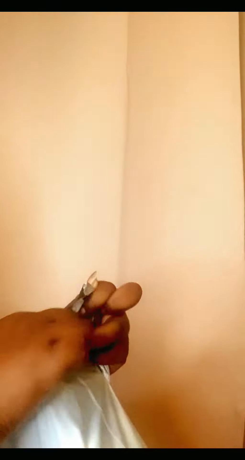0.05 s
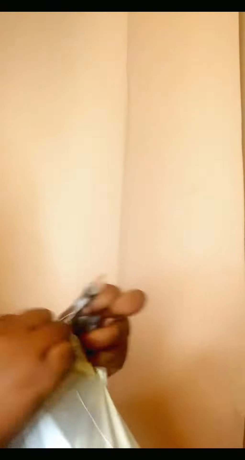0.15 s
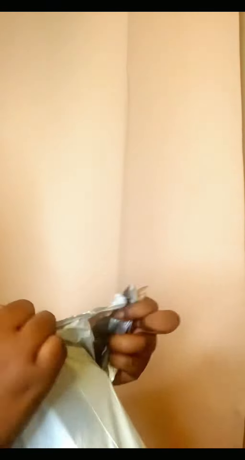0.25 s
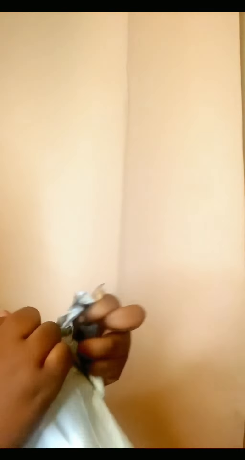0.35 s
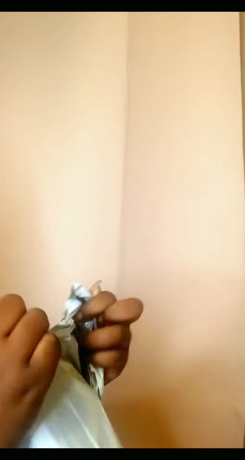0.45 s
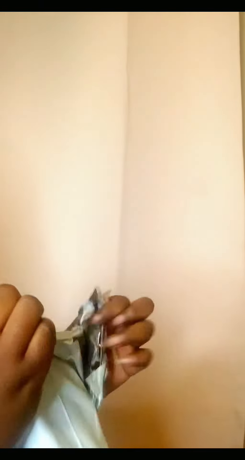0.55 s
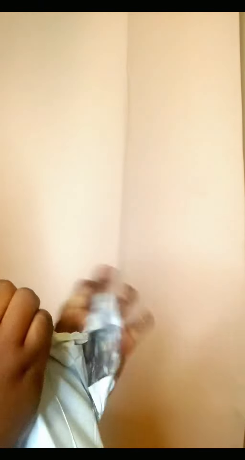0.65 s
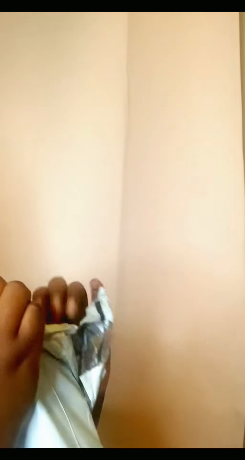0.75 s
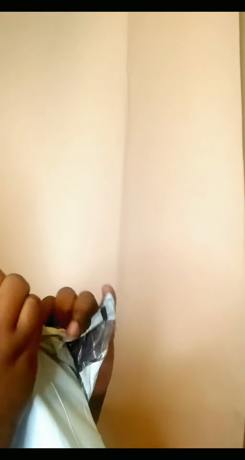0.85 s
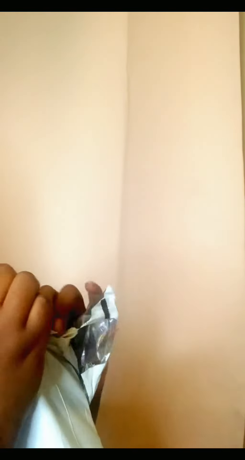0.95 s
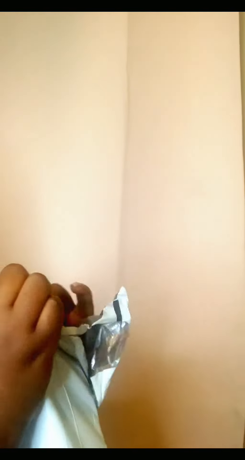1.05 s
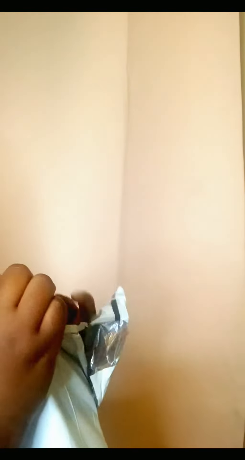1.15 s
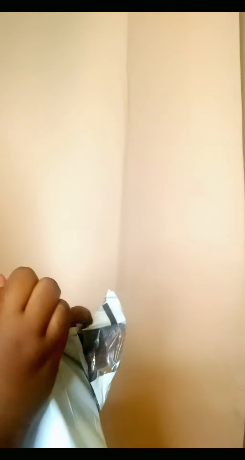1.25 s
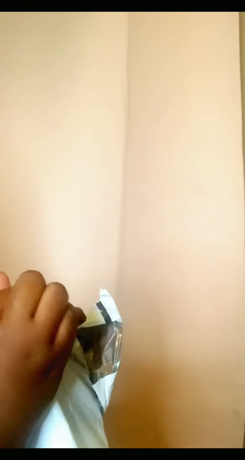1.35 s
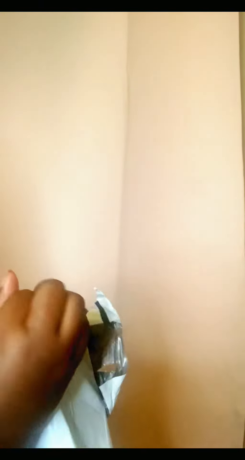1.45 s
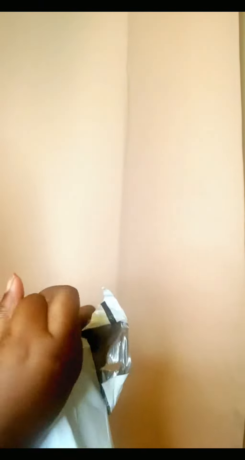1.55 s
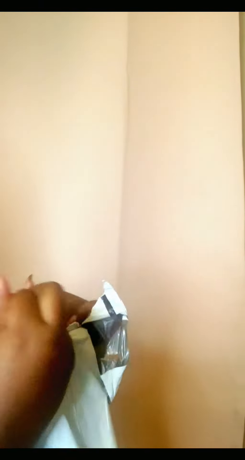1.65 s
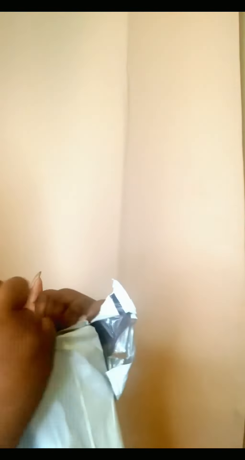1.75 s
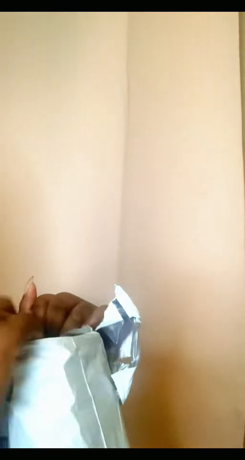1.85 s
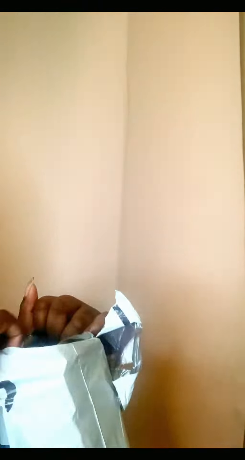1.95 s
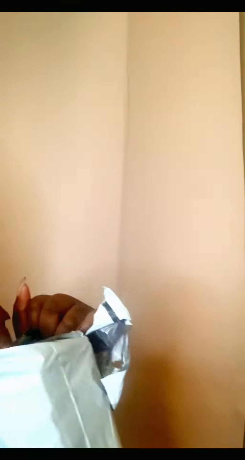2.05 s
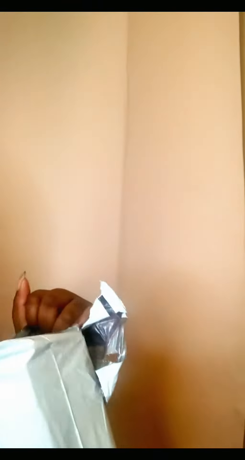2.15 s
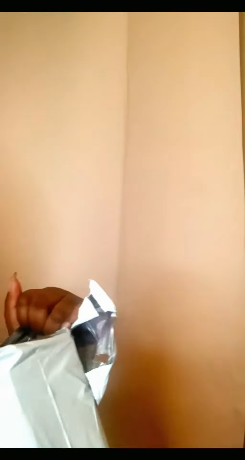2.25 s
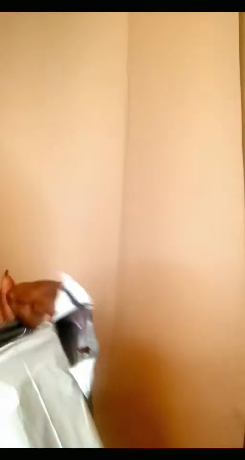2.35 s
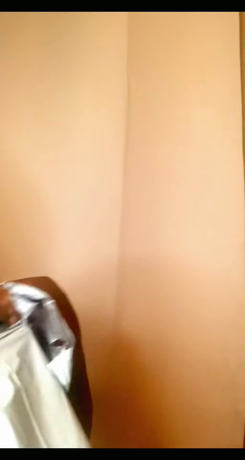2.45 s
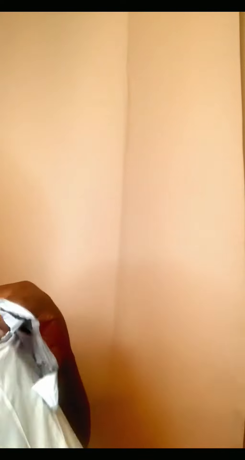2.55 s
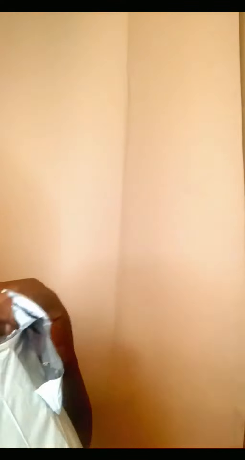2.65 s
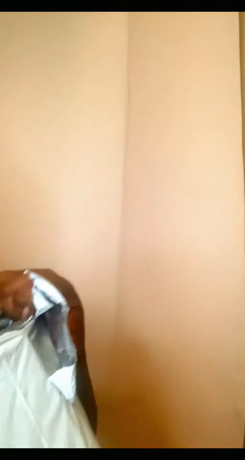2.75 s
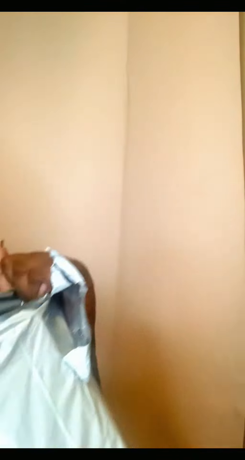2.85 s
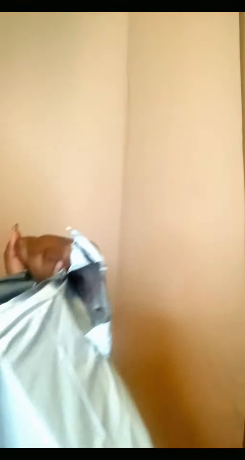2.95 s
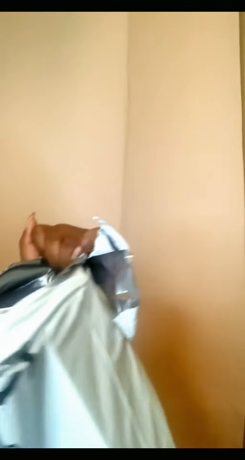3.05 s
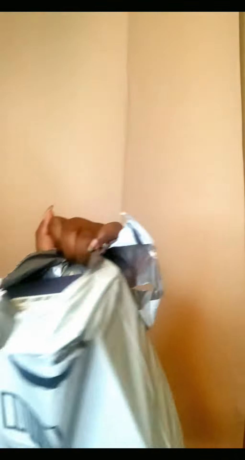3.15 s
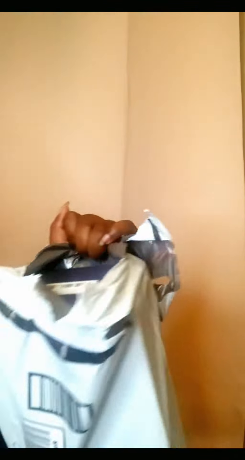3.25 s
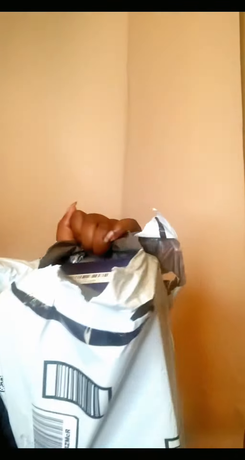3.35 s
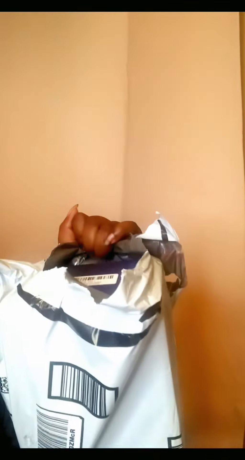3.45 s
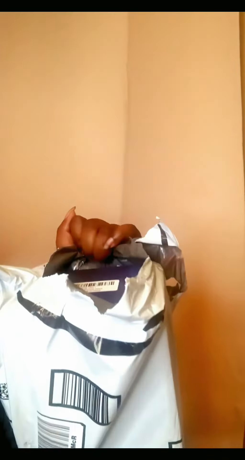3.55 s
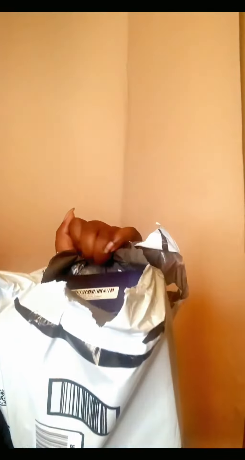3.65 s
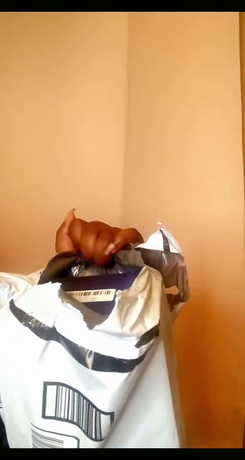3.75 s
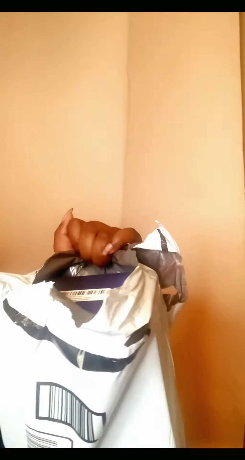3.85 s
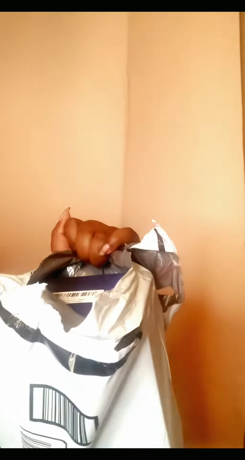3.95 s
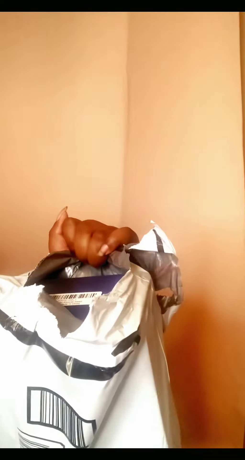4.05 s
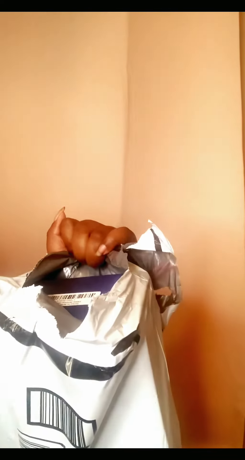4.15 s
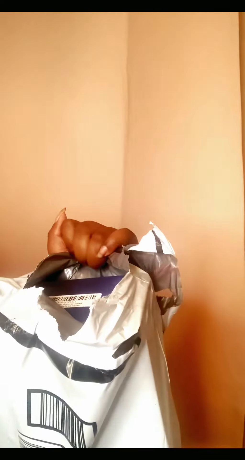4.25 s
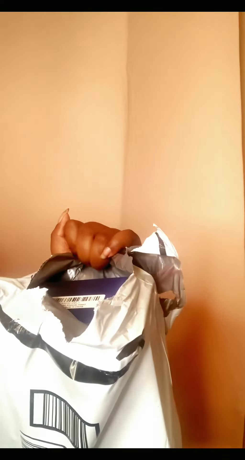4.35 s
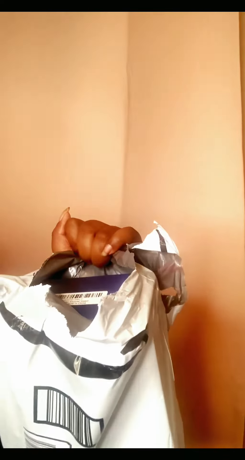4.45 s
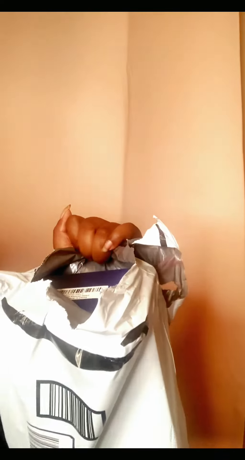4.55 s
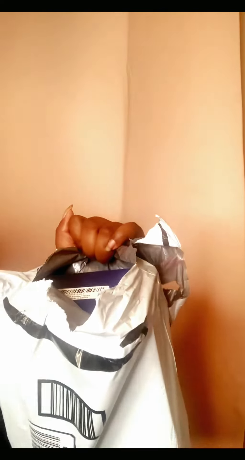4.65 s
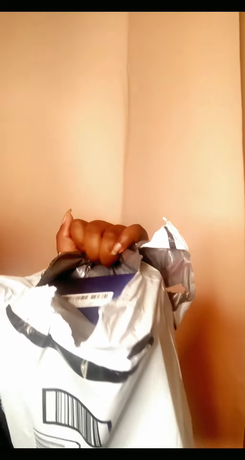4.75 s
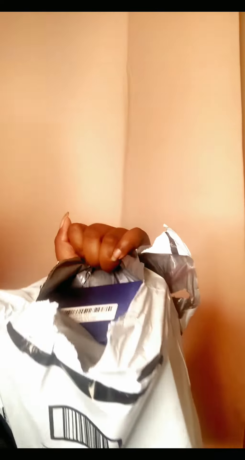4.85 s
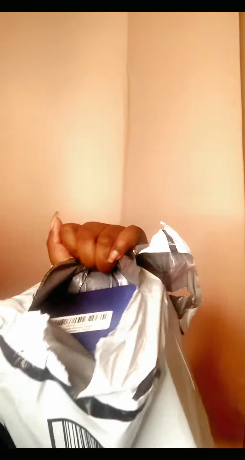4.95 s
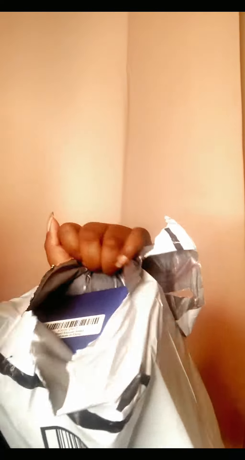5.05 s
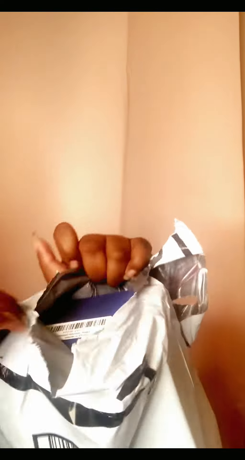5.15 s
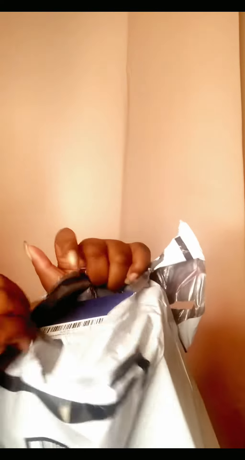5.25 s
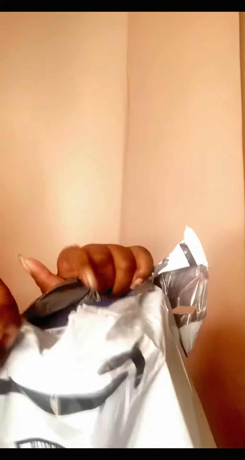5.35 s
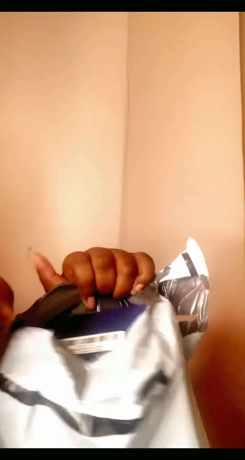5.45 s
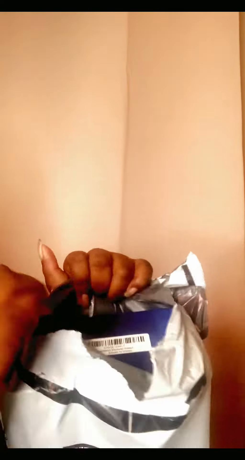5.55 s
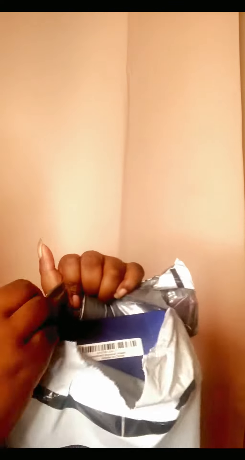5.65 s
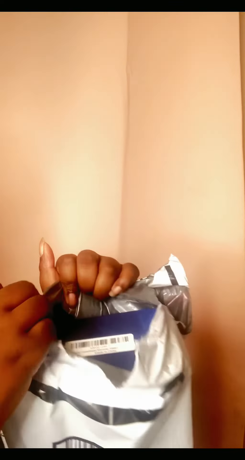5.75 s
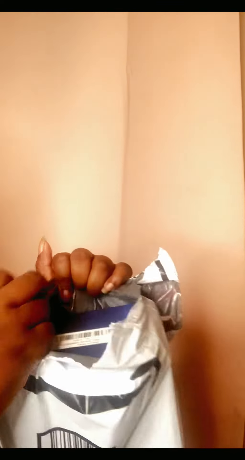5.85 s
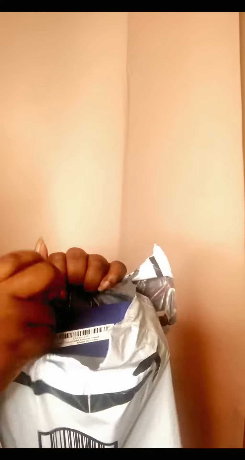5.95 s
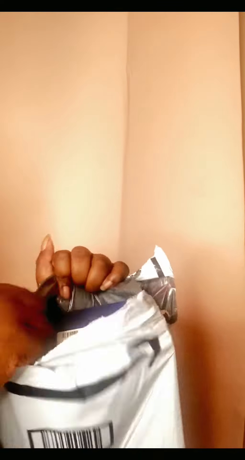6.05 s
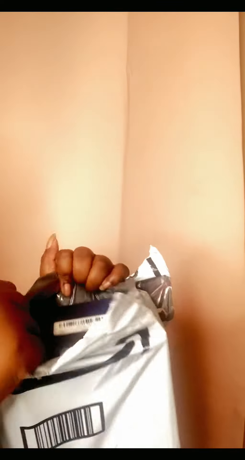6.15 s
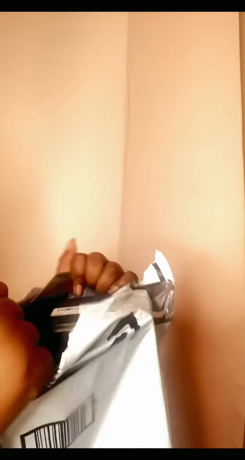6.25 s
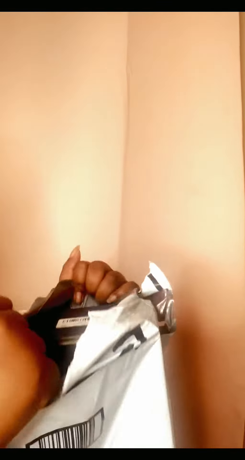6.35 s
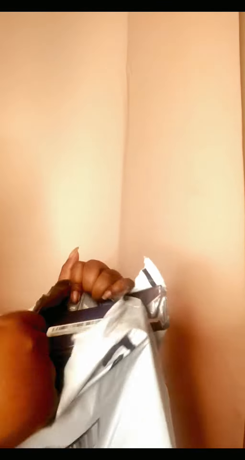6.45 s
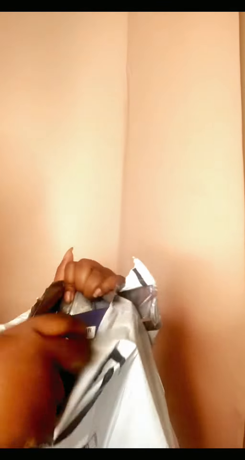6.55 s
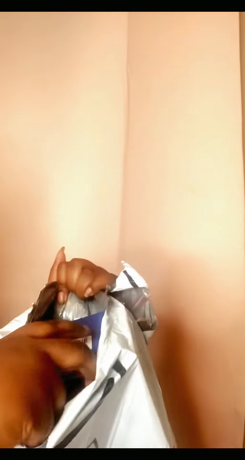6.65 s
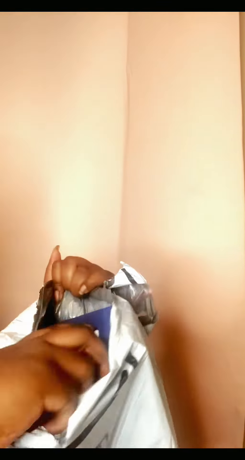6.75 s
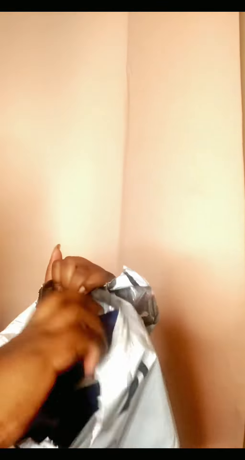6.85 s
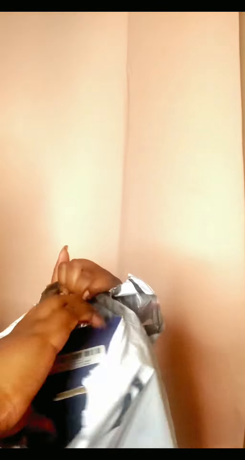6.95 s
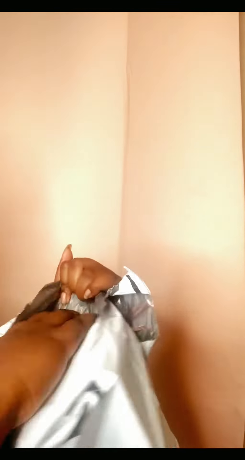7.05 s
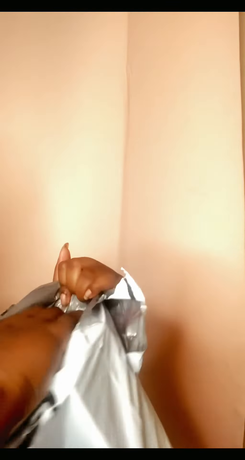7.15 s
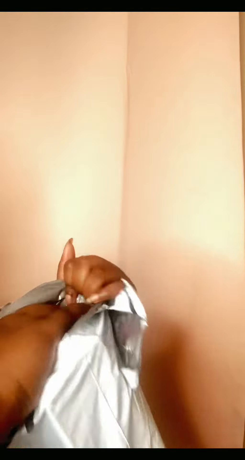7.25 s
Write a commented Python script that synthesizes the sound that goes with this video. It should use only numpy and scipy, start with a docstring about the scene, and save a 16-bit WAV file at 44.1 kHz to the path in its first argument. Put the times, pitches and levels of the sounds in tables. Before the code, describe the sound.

Close, crisp plastic film crinkling with bright snaps and soft low thumps, a quiet hum-filled gap midway, then renewed rummaging in the bag.

```python
"""Plastic film crinkles over low room rumble and hum as hands tear open a mailer bag in a small bare room.
Swarms of tiny cracks make the crinkle, single cracks the snaps; dense swarms under hard pulls, a rasp.
Low-coloured swarms flap and boom, swinging tones thump, falling chirps pop as the slack sheet goes taut.
A cardboard box scuffs in dull grains, mostly during a quiet pause, before the handling resumes
over hollow bumps."""
import sys
import numpy as np
from scipy import signal
from scipy.fft import rfft, irfft
from scipy.io import wavfile
from scipy.ndimage import uniform_filter1d

SR = 44100
rng = np.random.default_rng(int(sys.argv[2]) if len(sys.argv) > 2 else 0)


def to_wav(sig):
    """Store sig (one row per channel, or 1-D mono) as 16-bit WAV at the path in sys.argv[1].

    Samples outside -1..1 are clipped; the rate is SR.
    """
    pcm = np.clip(np.atleast_2d(sig), -1, 1) * 32767
    pcm = np.round(pcm).astype(np.int16)
    wavfile.write(sys.argv[1], SR, pcm.T)  # frames by channels


N = 321930
TIME = np.arange(N) / SR
BINS = np.fft.rfftfreq(N, 1 / SR)


def gain_of(db):
    """Amplitude factor of a level in dB."""
    return 10 ** (np.asarray(db) / 20)


def evened(x):
    """Scales x to unit RMS."""
    return x / np.sqrt(np.mean(x ** 2) + 1e-20)


def read(points, hz):
    """Reads a spectrum on a log-frequency axis."""
    f, value = np.transpose(points)
    return np.interp(np.log(hz + 1), np.log(f + 1), value)


def curves(rows):
    """One value a sample for each column of a table after its time."""
    s, *columns = np.transpose(rows)
    return [np.interp(TIME, s, c) for c in columns]


def colour(x, points):
    """Filters x by a spectrum, keeping the power of white noise."""
    return irfft(rfft(x) * evened(gain_of(read(points, BINS))), N)


def add(mix, s, sound):
    """Mixes a sound in at s seconds, cut at the end of the mix."""
    part = mix[:, max(round(s * SR), 0):][:, :sound.shape[1]]
    part += sound[:, :part.shape[1]]


def brighten(x, tilt_db, split_hz=5000):
    """Leans the sound towards its treble or away from it."""
    low = signal.sosfiltfilt(signal.butter(1, split_hz, fs=SR, output="sos"), x)
    return low * gain_of(-tilt_db / 2) + (x - low) * gain_of(tilt_db / 2)


def wander(top_hz):
    """Slow chance of unit RMS, with little faster than top_hz."""
    return evened(irfft(rfft(rng.standard_normal(N)) / (1 + (BINS / top_hz) ** 6), N))


def strokes(rows, column):
    """Force of strokes that swell to a height and let go; an end before the height cuts the stroke off."""
    force = 0
    for row in rows:
        shape = np.interp(TIME, row[:3], [0, 1, 0])
        force = force + gain_of(row[column]) * shape ** 1.07
    return force


def crack(rise_s, patchy_db, ring_db, ring_s, size=512):
    """One crease buckles: a quick swell and a brief ring, coloured by the facet of film that moves."""
    t = np.arange(size) / SR
    hz = np.fft.rfftfreq(size, 1 / SR)
    knots = np.linspace(0, np.sqrt(SR / 2), num=18)
    facet_db = patchy_db * np.interp(np.sqrt(hz), knots, rng.standard_normal(18))
    spectrum = rfft(rng.standard_normal((2, size))) * gain_of(facet_db)
    flip = irfft(spectrum) * (t / rise_s * np.exp(1 - t / rise_s)) ** 2
    dull = irfft(spectrum / np.hypot(1, hz / 5000))  # the ring has less treble than the flip
    ring = dull * gain_of(ring_db) * np.exp(-t / ring_s) * (1 - np.exp(-t / rise_s))
    both = flip + ring
    return both / np.linalg.norm(both, axis=1, keepdims=True)


def swarm(per_s, spread_db, count=200):
    """A swarm of randomly timed cracks, sizes spread exponentially in dB, levelled to steady power."""
    sizes = gain_of(spread_db * np.minimum(rng.exponential(1, N), 3.5))
    sizes *= rng.random(N) < per_s / SR
    sizes /= np.sqrt(abs(uniform_filter1d(sizes ** 2, size=2200)) + 1e-4)
    facets = [crack(rise_s=0.00038, patchy_db=4.5, ring_db=-2.5, ring_s=0.0041) for _ in range(count)]
    which = rng.integers(0, count, N)
    out = np.zeros((2, N))
    for at in np.flatnonzero(sizes):
        add(out, at / SR, sizes[at] * facets[which[at]])
    return out


def folding(x, patchy_db, facet_db):
    """Narrow resonances flicker, and broad bands rise and fall more slowly, as a folding sheet's do."""
    z = signal.stft(x, nperseg=512, noverlap=384)[2]
    fine, broad = rng.standard_normal((2, *z.shape[1:]))
    fine = evened(uniform_filter1d(uniform_filter1d(fine, size=4, axis=0), size=8, axis=1))
    broad = evened(uniform_filter1d(uniform_filter1d(broad, size=12, axis=0), size=16, axis=1))
    gains = evened(gain_of(patchy_db * fine + facet_db * broad))
    return signal.istft(z * gains, nperseg=512, noverlap=384)[1][:, :N]


# Spectra of the room noise, common to both ports and opposed between them.
# Each row: frequency in Hz, density in dB per Hz.
RUMBLE = [(15, -54.5), (25, -19), (49, 2.5), (71, 3.5), (95, -10), (118, -1), (264, -2), (326, 2),
          (394, -6), (427, 3), (621, -24.5), (700, -32.5), (1130, -29), (1480, -23.5), (2600, -34.5),
          (4700, -45.5), (5900, -41), (7300, -46.5), (9770, -46), (15000, -63)]
RUMBLE_SIDE = [(15, -47.5), (25, -29), (49, -25), (128, -7), (427, -13), (488, -11.5), (1580, -36.5),
               (5420, -51), (7280, -68.5), (9770, -58), (15000, -54)]
RUMBLE_DB, RUMBLE_SIDE_DB = -56.5, -53
HISS_WAVER_DB = 1.1
NOISE_LEFT_DB = 2  # left over right


def room_noise():
    """A steady low rumble with a wavering mains hum, under a faint hiss that comes and goes."""
    mid = gain_of(RUMBLE_DB) * colour(rng.standard_normal(N), RUMBLE)
    side = gain_of(RUMBLE_SIDE_DB) * colour(rng.standard_normal(N), RUMBLE_SIDE)
    noise = np.array([mid + side, mid - side])
    hiss = signal.sosfiltfilt(signal.butter(4, 750, "high", fs=SR, output="sos"), noise)
    hiss_gain = gain_of(2.0 + HISS_WAVER_DB * wander(top_hz=9.1))
    wavering = folding(hiss, patchy_db=2.0, facet_db=2.0) * hiss_gain
    hum = gain_of(-60.5) * (1 + 0.28 * wander(top_hz=5)) * np.sin(2 * np.pi * 60.2 * TIME)
    balance = gain_of([[NOISE_LEFT_DB / 2], [-NOISE_LEFT_DB / 2]])
    return (noise - hiss + wavering + hum) * balance


# Steady handling of the film between squeezes. Each row: time in seconds, crinkle level in dB.
HANDLING = [(0, -43.5), (.25, -35.5), (.47, -35), (.7, -47), (1.1, -47.5), (1.7, -39.5), (1.88, -46.5),
            (1.96, -51), (2.28, -39), (2.75, -50), (3.05, -50.5), (3.35, -51.5), (3.48, -76.5),
            (4.55, -92.5), (4.75, -66), (4.96, -67.5), (5.03, -41.5), (5.2, -38), (5.6, -41.5), (5.7, -38),
            (5.84, -37.5), (5.89, -49.5), (5.93, -44), (6.1, -36.5), (6.4, -40), (6.85, -45.5), (6.94, -53),
            (7.02, -49.5), (7.3, -42.5)]
# The fingers squeeze the film.
# Each row: start in seconds, hold in seconds, crinkle level in dB, lean towards the treble in dB.
SQUEEZES = [(0, 0.033, -33, -2), (0.301, 0.024, -33, 3), (0.592, 0.021, -42.5, -0.5),
            (0.764, 0.014, -38.5, 19), (0.877, 0.017, -43.5, -3), (0.921, 0.081, -47, -1.5),
            (1.003, 0.016, -41, -3.5), (1.117, 0.012, -42, -3), (1.156, 0.023, -45, 13),
            (1.206, 0.029, -40, 1.5), (1.325, 0.097, -34.5, 4), (1.562, 0.06, -38.5, -2),
            (1.612, 0.091, -38.5, 8), (1.737, 0.019, -36, -4), (1.811, 0.044, -39, 3),
            (2.019, 0.18, -40.5, 1.5), (2.224, 0.021, -41, 19), (2.325, 0.066, -27.5, 1),
            (2.501, 0.055, -36.5, 4), (2.539, 0.032, -32.5, 1), (2.626, 0.081, -43, -5.5),
            (2.776, 0.066, -49.5, -3), (2.959, 0.03, -45.5, 5), (3.07, 0.011, -43, -7),
            (3.126, 0.031, -42.5, 2), (3.199, 0.12, -43, -3.5), (3.512, 0.036, -63.5, -21),
            (3.638, .07, -74, -10.5), (3.934, 0.0097, -64.5, -26), (4.628, 0.06, -61.5, -14),
            (4.678, 0.013, -47, -9.5), (5.048, 0.0062, -35.5, 5), (5.097, .05, -41.5, 1),
            (5.167, 0.37, -35.5, 4), (5.924, 0.027, -42.5, -7), (5.973, 0.072, -37, 3),
            (6.154, 0.097, -35.5, 11), (6.572, 0.082, -37, -7), (6.705, 0.04, -40.5, 8),
            (6.755, 0.042, -36.5, 3), (6.843, 0.015, -36, 0), (7.024, 0.01, -39, -2), (7.04, 0.02, -39, -2),
            (7.095, 0.018, -38.5, 4.5), (7.177, .05, -40, -0.5), (7.293, 0.03, -32, -4)]
USUAL_DB = -34.5  # crinkle level of ordinary handling
HELD_TREBLE_DB, TREBLE_PER_DB = -1, 0.3542  # lean at USUAL_DB, and dB of lean per dB of handling
ATTACK_S, RELAX_DB_PER_S = 0.0025, 277


def effort():
    """Crinkle level and treble lean in dB: the steady handling, plus squeezes that bite, hold and relax."""
    held_db, = curves(HANDLING)
    power = gain_of(held_db) ** 2
    lean = power * (HELD_TREBLE_DB + TREBLE_PER_DB * (held_db - USUAL_DB))
    for start_s, hold_s, db, treble_db in SQUEEZES:
        t = TIME - start_s
        bite = np.clip(t / ATTACK_S, 0, 1)
        held = gain_of(db - RELAX_DB_PER_S * np.maximum(t - hold_s, 0))
        squeeze = (bite * held) ** 2
        power = power + squeeze
        lean = lean + squeeze * treble_db
    return 10 * np.log10(power), lean / power  # lean averaged by power


# Spectrum of the cracking film at one microphone port. Each row: frequency in Hz, density in dB per Hz.
FILM = [(150, -38), (400, -5.5), (620, -2.5), (780, -8.5), (1000, -1.5), (1550, -1.9), (2200, -3.5),
        (3200, 0), (4200, -2), (5500, -2), (8000, -3), (11500, -3), (13000, -2), (16000, -8.5)]
CRACKS_PER_S, CRACKS_FOLLOW = 1900, 0.3  # rate at USUAL_DB, and dB of rate per dB of crinkle


def crinkle(level_db, treble_db, clump_db=2.5):
    """Creases give way in swarms as the film is worked; the rate wanders, so they clump and thin out."""
    rate_db = CRACKS_FOLLOW * (level_db - USUAL_DB) + clump_db * wander(top_hz=56.3)
    cracks = colour(swarm(CRACKS_PER_S * gain_of(rate_db), spread_db=3.5), FILM)
    return brighten(cracks, treble_db) * gain_of(level_db)


# Slow bending of the whole sheet under ordinary handling. Each row: time in seconds, level in dB.
FLEX = [(0, -43), (.3, -42), (.85, -50.5), (1.1, -49), (1.35, -53), (1.6, -56), (1.9, -57), (2.56, -48),
        (3.2, -55.5), (4.7, -45), (5.3, -60.5), (5.65, -53.5), (6.45, -59.5), (7.03, -46), (7.3, -55.5)]
# Spectrum of the flapping sheet. Each row: frequency in Hz, density in dB per Hz.
SHEET = [(30, -20.5), (70, -5.5), (140, 2), (280, -1), (420, 2), (560, 5.5), (750, -0.5), (1200, -6),
         (3000, -65)]
FLEX_FOLLOW = 0.64  # dB of flapping per dB of crinkle


def flex(level_db):
    """The slack sheet flaps in soft low puffs, harder with each squeeze."""
    usual_db, = curves(FLEX)
    puffs = colour(swarm(per_s=900, spread_db=3.0), SHEET)
    return puffs * gain_of(usual_db + FLEX_FOLLOW * (level_db - USUAL_DB))


# Deep boom of the air in the bag. Each row: time in seconds, level in dB.
BOOM = [(0, -59), (.25, -49.5), (.8, -59), (1.6, -54), (2.2, -73)]
# Spectrum of the boom. Each row: frequency in Hz, density in dB per Hz.
DEEP = [(25, -27), (55, -1.5), (90, -5.5), (130, 0.5), (250, -31), (1000, -69)]


def boom():
    """A deep, soft boom comes with the tugging at the closed bag, alike at both ports."""
    level_db, = curves(BOOM)
    return colour(swarm(per_s=400, spread_db=3.0, count=20)[0], DEEP) * gain_of(level_db)


# A tug thumps a slack panel of the bag.
# Each row: time of its height in seconds, level in dB, mid pitch of the panel in Hz.
THUMPS = [(.07, -43, 236), (.205, -41, 170), (.25, -41, 180), (.41, -42.5, 553), (.425, -48, 130),
          (.6, -38.5, 440), (.69, -45, 70), (.755, -45, 155), (0.971, -44.5, 417), (1.028, -43, 399),
          (1.12, -45.5, 406), (1.378, -52, 111), (1.58, -41, 418), (1.622, -36.5, 544), (1.633, -45, 110),
          (1.775, -51, 130), (1.85, -49, 280), (2.06, -46, 139), (2.23, -50, 110), (2.337, -33, 530),
          (2.41, -49, 119), (2.495, -46, 222), (2.591, -50, 120), (2.715, -47, 75), (2.87, -52, 110),
          (3.22, -50.5, 130), (3.355, -54.5, 150), (4.606, -57, 100.5), (5.22, -47.5, 220),
          (5.265, -43, 440), (5.371, -42, 158), (5.66, -44, 130.3), (6.28, -43, 220), (6.31, -43, 110),
          (6.86, -51, 99), (6.94, -57, 129)]
THUMP_RISE_S, THUMP_WAVER = 0.0143, .2  # waver: RMS of the log pitch


def thumps():
    """A tugged panel swings briefly, its pitch unsteady as the tension shifts under the fingers."""
    out = np.zeros((2, N))
    tension = np.exp(THUMP_WAVER * wander(top_hz=107))
    t = np.arange(round(.12 * SR)) / SR
    swing = (t / THUMP_RISE_S * np.exp(1 - t / THUMP_RISE_S)) ** 2
    for s, db, hz in THUMPS:
        pitch_hz = hz * tension[round(s * SR):][:len(t)]
        turns = np.cumsum(pitch_hz) / SR + rng.random()
        wave = gain_of(db) * swing * np.exp(2j * np.pi * turns)
        add(out, s - THUMP_RISE_S, np.array([wave.imag, wave.real]))
    return out


BEND_DELAY_S = 0.002626  # a 1 kHz bending wave takes this long to cross the sheet


def disperse(x, top_hz=12000):
    """Short bending waves outrun long ones: the treble of a snap arrives first and its middle trails."""
    slowness = np.sqrt(1000 / np.clip(BINS, 500, top_hz))
    delay_s = BEND_DELAY_S * (slowness - np.sqrt(1000 / top_hz))
    return irfft(rfft(x) * np.exp(-2j * np.pi * np.cumsum(delay_s) * SR / N), N)


# Single snaps, from loud cracks to faint ticks in the pause.
# Each row: time in seconds, level over a millisecond in dB, lean towards the treble in dB.
SNAPS = [(.3115, -18.5, -2.5), (.4508, -24, 14.5), (.4585, -26, 18), (.474, -28, 8.5), (.5015, -26, 4.5),
         (.5042, -20, 8), (.5145, -30, 5), (.5975, -31, -10), (.6268, -22, 20.5), (.67, -33, -1),
         (.736, -29.5, -4), (.779, -21, -3.5), (.816, -25, 13), (.89, -33.5, -8), (1.0235, -33, 7),
         (1.1675, -38, 12), (1.1858, -32, -14), (1.3275, -25, 15), (1.3995, -35, 11), (1.527, -30, 5),
         (1.6175, -23.5, -8), (1.654, -20.5, 0), (1.7215, -26.5, -3), (1.76, -20.5, 6), (1.862, -28, 11),
         (1.8727, -25.5, -11.5), (1.8966, -36, -13), (1.9056, -19, 13.5), (1.9795, -25.5, 19.5),
         (2.0356, -26.5, -12.5), (2.056, -25, -14), (2.0787, -23, -3), (2.1135, -24.5, 8),
         (2.1529, -22.5, 6.5), (2.2161, -18.5, 6), (2.2311, -35, 7), (2.238, -14.5, 20.5),
         (2.2415, -20, 17), (2.2541, -28, 14.5), (2.285, -27, 13), (2.3062, -21, 6), (2.316, -21, 8.5),
         (2.3275, -19.5, 2), (2.3478, -16.5, 12.5), (2.4863, -26, 5.5), (2.5045, -32, 15),
         (2.5351, -29, 12.5), (2.5589, -20, 10), (2.5812, -19, 13), (2.6141, -27, 10.5), (2.64, -32, 5),
         (2.699, -30, 9.5), (2.7776, -28, 9), (2.8351, -29, 1), (2.8483, -27.5, -3), (2.9022, -26, 8),
         (3.077, -19.5, 20.5), (3.091, -36, 12), (3.1286, -26.5, 8), (3.2014, -22.5, 19.5),
         (3.229, -30, 17), (3.2344, -24, 28), (3.2568, -35, 2.5), (3.2943, -28, 7), (3.403, -35, -40),
         (3.5217, -46, -14), (3.5506, -43.5, -29), (3.5744, -48, -18), (3.648, -48, -26), (3.745, -48, 0),
         (3.88, -53, -15), (4.187, -55.5, -25.5), (4.3066, -43, 8), (4.6255, -50, -10), (4.6495, -39.5, -6),
         (4.682, -40, -2), (4.7215, -50, -18), (4.7734, -39.5, -10), (4.9064, -48, -9), (4.9856, -32, 5),
         (5.0143, -25.5, 24), (5.094, -24.5, -5), (5.177, -20.5, 13), (5.258, -22, -10), (5.2763, -18, 13),
         (5.3049, -19, 17), (5.3337, -24, 16), (5.3621, -20, -3), (5.4015, -20, 4.5), (5.452, -22, -18),
         (5.488, -33, 3), (5.5491, -20, 6), (5.6186, -39, -18), (5.7455, -20, 20), (5.7733, -16, 4.5),
         (5.8256, -27.5, -11), (5.9308, -32, 6), (6.0078, -24.5, 10), (6.0445, -19.5, -6),
         (6.074, -17, 9.5), (6.1896, -20, 11), (6.3912, -33, -5), (6.466, -30, 10), (6.4892, -29, -17),
         (6.5355, -29, 10), (6.6422, -26, 6), (6.7529, -29, 4), (6.7794, -22.5, 5), (6.8539, -27.5, 5),
         (6.862, -24, 5), (6.874, -25, 13), (6.9116, -33, 10), (6.9717, -34, 1), (6.9968, -37, 3),
         (7.0826, -26, 9.5), (7.0954, -26, -5), (7.1065, -20.5, 11), (7.1531, -31, -1), (7.1885, -27.5, 11),
         (7.226, -23, 13), (7.2528, -32, 9), (7.276, -27.5, 26)]
# stray snaps at random times, level and treble relative to the crinkle around them
STRAYS_PER_S, STRAY_OVER_DB, STRAY_SPREAD_DB = 13, 6, 0.5
STRAY_TREBLE_DB, STRAY_TREBLE_SPREAD_DB = 12, 6
SETTLE_DB, SETTLE_S = -7, .0025  # smaller flip after each snap, and its mean delay


def snaps(level_db, lean_db):
    """Single creases flip, from loud cracks to faint ticks; strays go at random, as loud as the handling."""
    chance, size, colouring = rng.random(N), rng.standard_normal(N), rng.standard_normal(N)
    events = list(SNAPS)
    for at in np.flatnonzero(chance < STRAYS_PER_S / SR):
        stray_db = level_db[at] + STRAY_OVER_DB + STRAY_SPREAD_DB * size[at]
        stray_lean_db = lean_db[at] + STRAY_TREBLE_DB + STRAY_TREBLE_SPREAD_DB * colouring[at]
        events.append((at / SR, stray_db, stray_lean_db))
    out = np.zeros((2, N))
    for s, db, treble_db in events:
        tick, settling = [crack(rise_s=.0003, patchy_db=3.5, ring_db=-5, ring_s=.0025) for _ in range(2)]
        add(tick, SETTLE_S * (.5 + rng.random()), gain_of(SETTLE_DB) * settling)
        tick = brighten(tick, treble_db)
        unit = tick / np.linalg.norm(tick[0]) * np.sqrt(SR / 1000)  # unit RMS over 1 ms
        add(out, s, gain_of(db) * unit)
    return disperse(colour(out, FILM))


# Hard pulls on the film. Each row: start in seconds, height in seconds, end in seconds,
# lean towards the treble in dB, rasp in dB, drumming of the taut bag in dB.
PULLS = [(0.114, 0.127, 0.18, -7, -27, -61), (0.14, 0.175, .24, -3, -22, -33),
         (2.315, 2.332, 2.33, 3, -23.5, -46), (6.036, 6.058, 6.1, 0.5, -29.5, -56),
         (6.147, 6.15, 6.2, -0.5, -28, -70), (6.16, 6.247, 6.28, -1.5, -24.5, -48.5)]


def pulls():
    """Stretched film tears and slides in a dense rasp."""
    rasp = colour(swarm(per_s=5000, spread_db=0.5), FILM)
    return sum(brighten(rasp, row[3]) * strokes([row], column=-2) for row in PULLS)


# Spectrum of the taut bag. Each row: frequency in Hz, density in dB per Hz.
TAUT = [(40, -20), (100, -14), (200, -5), (330, -16), (440, 1), (620, 1), (720, -25.5), (1500, -49)]


def drumming():
    """Under a pull the taut bag booms like a loose drum skin, alike at both ports."""
    return colour(swarm(per_s=1600, spread_db=-5.0)[0], TAUT) * strokes(PULLS, column=-1)


# The box shifts inside the bag; a row that ends before it starts is silent.
# Each row: start in seconds, height in seconds, end in seconds, level in dB.
SCUFFS = [(2.152, 2.155, 2.19, -40), (3.403, 3.416, 3.48, -47), (3.54, 3.552, 4.2, -67),
          (3.878, 3.882, 3.94, -62), (3.932, 3.947, 3.977, -52), (4.03, 4.08, 4, -67),
          (4.54, 4.64, 4.7, -63.5), (4.683, 4.7, 4.75, -48.5), (4.7, 4.74, 4.65, -62.5),
          (4.89, 4.912, 4.95, -57.5), (6.482, 6.492, 6.54, -42.5)]
# Spectrum of the scuffing box. Each row: frequency in Hz, density in dB per Hz.
CARDBOARD = [(200, -37), (600, -4), (950, 6.5), (1600, -1.5), (2300, -3), (4000, -15), (9000, -31)]


def scuffs():
    """Cardboard slips against the film in fine, dull grains."""
    return colour(swarm(per_s=2400, spread_db=5.5), CARDBOARD) * strokes(SCUFFS, column=-1)


# The sheet pops taut.
# Each row: start in seconds, level in dB, first pitch in Hz, last pitch in Hz, length in seconds.
POPS = [(2.152, -28, 1030, 217, 0.0116), (5.375, -26, 628, 176, 0.0072), (5.616, -23.5, 678, 139, 0.013),
        (6.023, -23.5, 421, 189.5, 0.0076), (6.699, -30.5, 748, 284, 0.0097)]
POP_RISE_S, POP_RATTLE_DB = 0.002, -3.5  # rattle relative to the pop


def pops():
    """Bending waves cross the sheet, short ones fastest: each pop is a falling chirp with a brief rattle."""
    out, shake = np.zeros((2, N)), np.zeros(N)
    for s, db, first_hz, last_hz, length_s in POPS:
        t = np.arange(round(length_s * SR)) / SR
        hz = np.geomspace(first_hz, last_hz, len(t))
        fade = np.cos(np.pi / 2 * (t / length_s) ** 2)
        force = gain_of(db) * np.minimum(t / POP_RISE_S, 1) * fade
        wave = force * np.exp(2j * np.pi * np.cumsum(hz) / SR)
        add(out, s, np.array([wave.imag, wave.real]))
        add(shake[None], s, force[None])
    rattle = brighten(colour(swarm(per_s=1100, spread_db=6.0, count=40), FILM), tilt_db=-8.0)
    return out + gain_of(POP_RATTLE_DB) * shake * evened(rattle)


# Hollow rumble of the opened bag around the box. Each row: time in seconds, level in dB.
HOLLOWS = [(4.45, -78.5), (4.7, -62.5), (5.0, -60.5), (5.35, -57), (5.8, -60), (6.25, -51), (6.55, -61.5),
           (6.9, -53.5), (7.3, -64)]
# Spectrum of the hollow rumble. Each row: frequency in Hz, density in dB per Hz.
CAVITY = [(60, -30), (95, -6.5), (130, 5), (200, -3.5), (270, -13), (600, -50)]
CAVITY_LEFT_DB = 5.5  # left over right


def hollow():
    """The hand nudges the box, and the air in the opened bag answers in soft, low bumps."""
    level_db, = curves(HOLLOWS)
    bumps = colour(swarm(per_s=300, spread_db=3.0, count=30)[0], CAVITY) * gain_of(level_db)
    return bumps * gain_of([[CAVITY_LEFT_DB / 2], [-CAVITY_LEFT_DB / 2]])


# Decay of the room. Each row: frequency in Hz, time to fall 60 dB in seconds.
ROOM = [(200, 0.14), (1000, 0.14), (4000, 0.12), (9000, 0.18), (16000, 0.094)]


def tail(size=17640):
    """Close bare walls: sparse echoes of random sign, each band dying at its own speed."""
    taps = rng.choice([-1., 1.], (2, size)) * (rng.random((2, size)) < 3000 / SR)
    taps[:, :round(.003 * SR)] = 0
    hz, t, z = signal.stft(taps, SR, nperseg=256)
    decay = gain_of(-60 * t / read(ROOM, hz)[:, None])
    echoes = signal.istft(z * decay, SR, nperseg=256)[1]
    return brighten(echoes / np.linalg.norm(echoes[0]), tilt_db=-11.0)


def room(x, wet_db, count=4):
    """The sound fades in turn through several random echo patterns, so no single one colours it throughout."""
    wet = 0
    for k in range(count):
        share = np.sqrt(2 / count) * np.cos(np.pi * (2 * TIME + k / count))
        wet = wet + signal.oaconvolve(x * share, tail(), axes=1)[:, :N]
    return x + gain_of(wet_db) * wet


# Likeness of the two ports. Each row: frequency in Hz, coherence from 0 to 1.
LIKENESS = [(60, 0.87), (300, 0.85), (520, 0.94), (780, 1), (1050, 0.87), (1500, 0.8), (2700, 0.28),
            (4000, 0.5), (5200, 0.66), (6000, 0.13), (6800, 0.6), (11500, 0.63), (13000, 0.98)]
# Phase between the ports. Each row: frequency in Hz, lead of the left in radians.
LEAD = [(60, -1.5), (260, 0.42), (430, 1.1), (600, 2.5), (760, 3.5), (1150, 3.5), (1500, 5.5), (2400, 4.5),
        (3200, 4.5), (4100, 6), (5000, 10), (5700, 10), (6300, 7), (10000, 5), (12700, np.pi),
        (20000, np.pi)]


def ports(x):
    """Two microphone ports hear a partly shared sound, with a phase that turns with frequency."""
    a, b = rfft(x)
    same = np.clip(read(LIKENESS, BINS), 0, 1)
    right = (same * a + np.sqrt(1 - same ** 2) * b) * np.exp(-1j * read(LEAD, BINS))
    return irfft(np.array([a, right]), N)


RUSTLE_TOP_HZ = 13500  # low-pass on the swarms; snaps reach higher
FOLD_COLOUR_DB = 1.5  # broad colouring by the folds


def scene():
    """Effort drives crinkle, snaps and flapping; film and body pass room and ports, the rest joins after."""
    level_db, treble_db = effort()
    small_cracks = crinkle(level_db, treble_db) + pulls() + scuffs()
    rustle = folding(small_cracks, patchy_db=2.0, facet_db=FOLD_COLOUR_DB)
    rustle = signal.sosfilt(signal.butter(8, RUSTLE_TOP_HZ, fs=SR, output="sos"), rustle)
    film = room(rustle + snaps(level_db, treble_db), wet_db=-8.5)
    body = room(flex(level_db) + thumps(), wet_db=-9.5) + room(pops(), wet_db=-11)
    return ports(film + body) + drumming() + boom() + hollow() + room_noise()


EDGE_HZ = 16200


def record(dry):
    """The recorder's band limit: a linear-phase low-pass."""
    return signal.oaconvolve(dry, signal.firwin(511, EDGE_HZ, window=("kaiser", 9), fs=SR)[None], "same")


dry = scene()
out = record(dry)
to_wav(out)
```